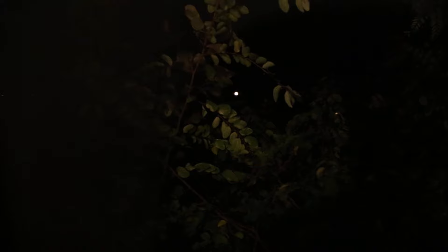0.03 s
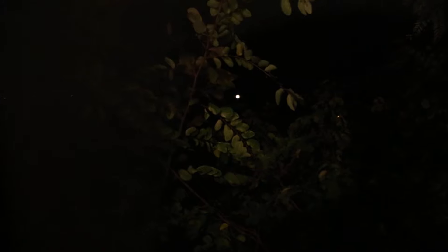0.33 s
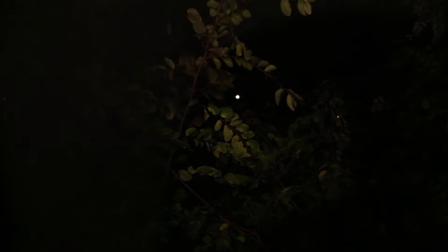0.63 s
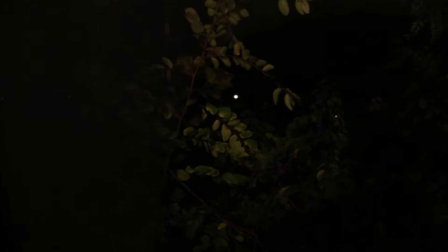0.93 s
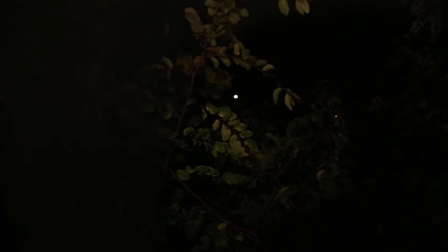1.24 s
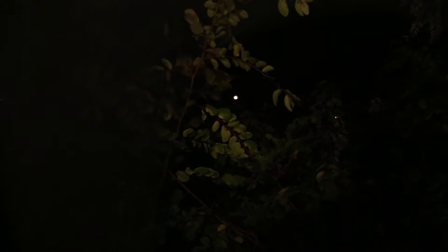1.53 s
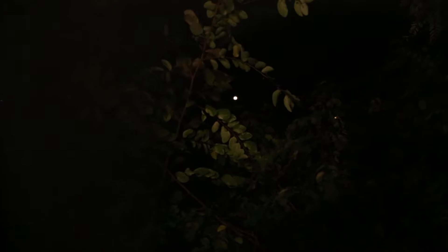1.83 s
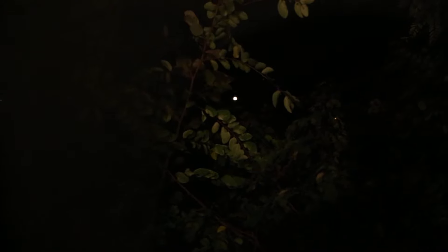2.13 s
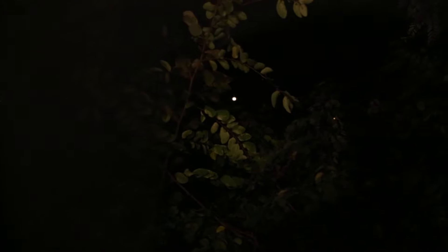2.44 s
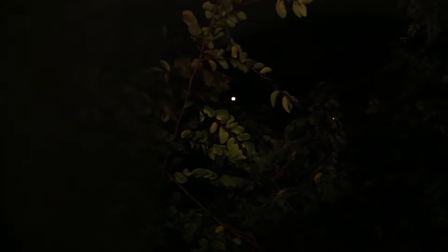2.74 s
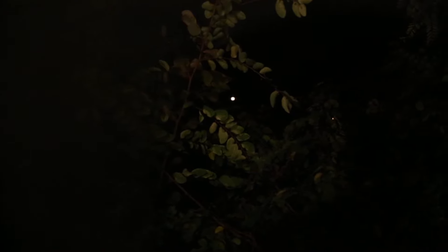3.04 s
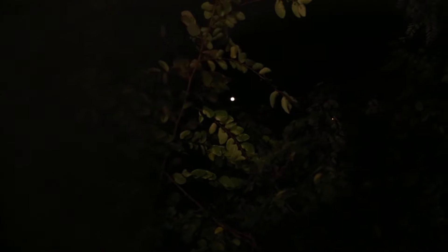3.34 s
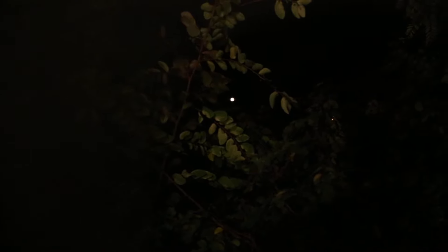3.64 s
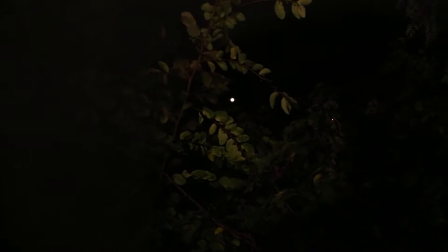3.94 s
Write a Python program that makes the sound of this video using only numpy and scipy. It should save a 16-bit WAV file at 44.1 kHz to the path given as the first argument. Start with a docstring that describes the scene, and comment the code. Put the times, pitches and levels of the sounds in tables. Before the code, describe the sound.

A dense chorus of small frogs whistles outdoors at night, echoing softly among trees. Close to the microphone, quick upward whistles mix with brief lower hoots, while thin cricket trills, hiss and a distant rumble continue behind.

```python
"""A night chorus of small tree frogs in dense foliage. After an instant of silence, a steady hiss and a
low distant rumble set in, with thinly trilling crickets and a crowd of far frogs scattered by the trees.
Near frogs then stand out to the end: some hoot, and others whistle about an octave higher, each whistle
a pure tone that slides up and levels off. The loudest whistles come near 1.5 s and 3.4 s."""
import sys
import numpy as np
from scipy import signal
from scipy.fft import rfft, irfft, next_fast_len
from scipy.io import wavfile
from scipy.ndimage import map_coordinates

SR = 44100
rng = np.random.default_rng(int(sys.argv[2]) if len(sys.argv) > 2 else 0)


def put_to_file(sound):
    """Save the sound as 16-bit audio at rate SR, in the file named by the first command-line argument."""
    columns = np.atleast_2d(sound).T  # one column per channel
    safe = np.clip(columns, -1, 1)
    whole_steps = np.round(safe * 32767)
    wavfile.write(sys.argv[1], SR, whole_steps.astype(np.int16))


N = 176400


def amp(db):
    """Amplitude ratio of a level in decibels."""
    return 10 ** (np.asarray(db) / 20)


def unit(x):
    """Normalisation to an rms of 1."""
    return x / np.sqrt(np.mean(x ** 2) + 1e-20)


def wobble(knots_per_s, size=N):
    """Smooth random modulation: a spline through Gaussian values."""
    return map_coordinates(rng.standard_normal(1024), [np.arange(size) * knots_per_s / SR], mode="wrap")


def add(track, start_s, x):
    """Superposition of x on the track from the given time."""
    i = max(round(start_s * SR), 0)
    part = track[i:i + len(x)]
    part += x[:len(part)]


def filtered(x, response):
    """Linear filtering: the spectrum of x times a frequency response."""
    size = next_fast_len(N + SR // 2)
    return irfft(rfft(x, size) * response(np.fft.rfftfreq(size, 1 / SR)), size)[:N]


def noise(spectrum):
    """Spectral shaping of white noise by rows of Hz and dB, at an rms of 1."""
    knots_hz, db = np.transpose(spectrum)
    white = rng.standard_normal(N)
    return unit(filtered(white, lambda hz: amp(np.interp(np.log(hz + 1), np.log(knots_hz), db))))


def tree_echo(x, t60_s=0.52, build_s=0.015):
    """Scattering by trunks and leaves: a diffuse, exponentially decaying echo with the energy of x."""
    t = np.arange(SR // 2) / SR
    envelope = np.exp(-np.log(1000) * t / t60_s) * (1 - np.exp(-t / build_s))
    echo = signal.fftconvolve(x, rng.standard_normal(len(t)) * envelope)
    return echo * np.linalg.norm(x) / (np.linalg.norm(echo) + 1e-20)


def night_air(hiss_db=-35):
    """Coloured noise makes the hiss and distant rumble; amplitude and phase modulation make a hum waver."""
    # Each row: frequency in Hz, relative spectral density in dB.
    hiss_spectrum = [(30, -26), (200, -5.5), (420, -2.5), (650, -0.5), (950, -1), (1200, -3), (1600, -1.5),
                     (2100, -2), (3100, -3), (3350, -6), (3800, -6.5), (5000, -14), (7300, -19),
                     (9700, -18), (12000, -25.5), (15500, -43)]
    rumble_spectrum = [(25, -42), (36, -37), (50, -10), (64, -17.5), (85, -6.5), (108, -12), (145, -1.5),
                       (195, -0.5), (222, -1.5), (250, -8.5), (295, -6), (400, -19), (700, -51.5)]
    # Each row: time in seconds, level of the rumble in dB.
    rumble_levels = [(0, -37.5), (1.1, -38.5), (1.7, -38), (2.4, -37), (2.8, -38), (4, -39)]
    # Each row: frequency in Hz, level in dB.
    hum_tones = [(196, -52), (293, -55.5)]
    t = np.arange(N) / SR
    hum = np.zeros(N)
    for hz, db in hum_tones:
        envelope = 1 + .5 * wobble(4.76)
        phase = 2 * np.pi * hz * t + 2 * wobble(6)
        hum += amp(db) * unit(envelope * np.sin(phase))
    rumble_db = np.interp(t, *np.transpose(rumble_levels))
    return amp(hiss_db) * noise(hiss_spectrum) + amp(rumble_db) * noise(rumble_spectrum) + hum


def chirp(hz, length_s=0.055, pulse_hz=45.3, spread_hz=18):
    """Amplitude modulation cuts a cricket's thin high tone into a short burst of pulses."""
    t = np.arange(round(length_s * SR)) / SR
    tone = np.sin(2 * np.pi * (hz + spread_hz * rng.normal()) * t)
    pulses = np.abs(np.sin(np.pi * pulse_hz * t))
    return unit(tone * np.sin(np.pi * t / length_s) * pulses)


def crickets():
    """Reverberation blurs the far crickets' steady chirping; a nearer one joins as direct sound only."""
    # Each row: pitch in Hz, chirps per second, level in dB.
    far_crickets = [(5640, 7.5, -59.5), (5580, 3.5, -61.5), (5470, 6.5, -62)]
    # Each row: start in seconds, level in dB.
    near_chirps = [(.165, -51), (1.331, -51), (2.135, -54), (2.206, -53), (3.875, -55)]
    out = np.zeros(N)
    for hz, rate, db in far_crickets:
        song = np.zeros(N + SR)
        for k in range(int(len(song) / SR * rate)):
            add(song, (k + .5 * rng.random()) / rate, chirp(hz))
        song += tree_echo(song)[:len(song)]
        out += amp(db) * unit(song[-N:])
    for start, db in near_chirps:
        add(out, start, amp(db) * chirp(hz=5560))
    return out


def frog_call(length_s, first_hz, last_hz, swell_share=0.54, release_share=0.27):
    """Frequency modulation: a slightly unsteady pure tone glides exponentially as it swells and fades."""
    bend, waver_hz, flutter_db = 2.6, 12.65, 1.5  # more bend levels the glide off sooner
    progress = np.linspace(0, 1, round(length_s * SR))
    glide = np.expm1(-bend * progress) / np.expm1(-bend)
    hz = first_hz + (last_hz - first_hz) * glide + waver_hz * wobble(120.1, len(progress))
    phase = 2 * np.pi * np.cumsum(hz) / SR
    swell = np.sin(np.pi / 2 * np.minimum(progress / swell_share, 1)) ** 1.19
    release = np.sin(np.pi / 2 * np.minimum((1 - progress) / release_share, 1))
    flutter = amp(flutter_db * wobble(169.4, len(progress)))
    return np.sqrt(2) * swell * release * flutter * np.sin(phase)


def far_frogs(thickets=8, spread_db=1):
    """A diffuse field: overlapping whistles and hoots from several thickets arrive only as echo."""
    # Each crowd: calls per second, final pitch in Hz, its spread in Hz, rise in Hz,
    # call length in seconds, level of the whole crowd in dB.
    whistlers = (110, 2784.5, 100, 480, 0.53, -34.5)
    hooters = (89.5, 1485, 48, -80, 0.2, -42)
    total = N + SR  # a second's lead lets the echo build up
    out = np.zeros(N)
    for rate, hz, spread_hz, rise_hz, length, db in (whistlers, hooters):
        crowd = np.zeros(total)
        for _ in range(thickets):
            thicket = np.zeros(total)
            for k in range(int(total / SR * rate / thickets) + 1):
                last_hz = hz + spread_hz * rng.triangular(-np.sqrt(6), 0, np.sqrt(6))
                start = (k + rng.random()) * thickets / rate
                gain = amp(spread_db * rng.normal())
                add(thicket, start, gain * frog_call(length, last_hz - rise_hz, last_hz))
            crowd += tree_echo(thicket)[:total]
        out += amp(db) * unit(crowd[-N:])
    return out


def near_frogs(hoot_offset_hz=54.5, hoot_echo_db=-11.5, leaves_re_echo_db=-4.5):
    """Multipath: rising whistles and falling hoots arrive directly, off trees and off the nearest leaves."""
    # Each row: start in seconds, length in seconds, first and last pitch in Hz, level in dB,
    # tree echo in dB relative to the direct sound.
    whistles = [ (.135, 0.094, 2480, 2696, -39, -1), (.17, .09, 2980, 3220, -44, -8),
                (.28, .15, 2410, 2920, -35.5, -2.5), (0.438, .07, 2550, 2770, -37, -2),
                (0.555, 0.086, 2480, 2750, -40, -1), (0.659, .085, 2500, 2784, -36, -8),
                (.91, 0.076, 2400, 2600, -44.5, 4), (.93, .08, 2950, 3170, -49, -4),
                (0.988, 0.14, 2400, 2790, -37, -16), (1.169, 0.12, 2150, 2801, -29, 0.5),
                (1.252, 0.13, 2745, 2970, -33, -10), (1.494, 0.12, 2110, 2710, -23.5, -5.5),
                (1.597, .075, 2414, 2730, -30.5, -6), (1.706, 0.12, 2300, 2660, -42, -2.5),
                (1.778, 0.079, 2620, 2923, -37, -6), (2.09, 0.1, 2480, 2810, -32, -2),
                (2.152, 0.094, 2700, 2950, -36, -8), (2.25, .09, 2580, 2830, -36.5, -3),
                (2.342, 0.16, 2427, 2750, -32, -16), (2.574, .055, 2220, 2420, -38, -1),
                (2.611, 0.12, 2450, 2730, -34, -3), (2.802, .08, 2520, 2785, -37, -6),
                (2.85, 0.097, 2960, 3190, -46, -2), (2.933, 0.11, 2430, 2806, -28.5, -15),
                (3.129, 0.088, 2480, 2776, -36.5, 1), (3.222, 0.11, 2560, 2847, -36, 1.5),
                (3.381, .108, 2140, 2700, -24.5, -14.5), (3.54, 0.12, 2640, 2895, -35, 1),
                (3.655, .147, 2533, 2970, -33, -6), (3.844, 0.11, 2200, 2820, -28, -4)]
    # Each row: start in seconds, length in seconds, pitch in Hz that the hoot falls through, level in dB.
    hoots = [(.07, 0.082, 1510, -42), (.35, 0.054, 1525, -37.5), (.43, 0.085, 1505, -40),
             (.805, 0.054, 1500, -37), (.915, 0.051, 1490, -36), (.98, 0.075, 1524, -36.5),
             (1.29, .08, 1480, -41.5), (1.82, 0.085, 1520, -42.5), (2.113, 0.1, 1511, -33),
             (2.40, 0.11, 1506, -36.5), (2.51, .06, 1505, -36), (2.575, 0.063, 1485, -34.5),
             (2.96, 0.062, 1480, -40), (3.08, 0.074, 1530, -37), (3.415, 0.08, 1548, -37),
             (3.69, 0.068, 1475, -32), (3.87, 0.065, 1500, -40)]
    calls = []
    for start, length, first_hz, last_hz, db, echo_db in whistles:
        calls.append((start, amp(db) * frog_call(length, first_hz, last_hz), echo_db))
    for start, length, hz, db in hoots:
        hoot = frog_call(length, hz + hoot_offset_hz, hz - hoot_offset_hz / 2, swell_share=.2)
        calls.append((start, amp(db) * hoot, hoot_echo_db))
    out = np.zeros(N)
    for start, call, echo_db in calls:
        add(out, start, call)
        add(out, start, amp(echo_db) * tree_echo(call))
        add(out, start, amp(echo_db + leaves_re_echo_db) * tree_echo(call, t60_s=0.094))
    return out


def scene():
    """Superposition of night air, frogs and crickets in one channel."""
    return (night_air() + near_frogs() + crickets() + far_frogs())[None]


def record(dry):
    """Gating and band limiting: an instant of silence opens the sound, and a low-pass cuts the top treble."""
    silence_s, cutoff_hz = .036, 15730
    gate = np.arange(N) / SR > silence_s
    return filtered(dry[0] * gate, lambda hz: hz < cutoff_hz)[None]


dry = scene()
out = record(dry)
put_to_file(out)
```